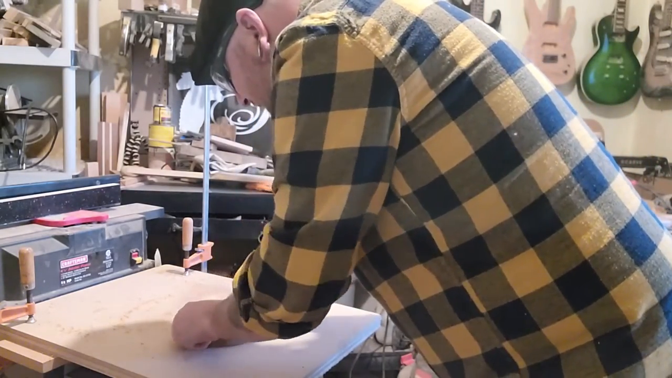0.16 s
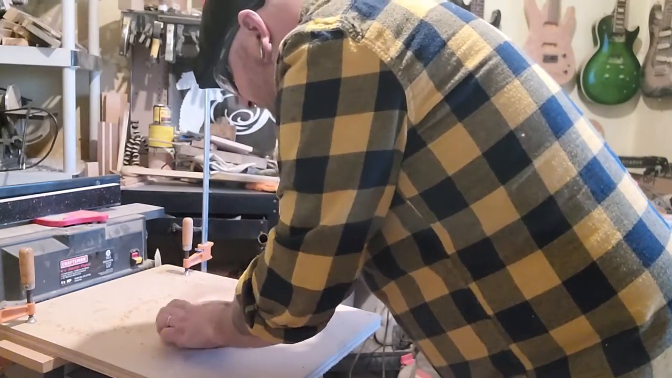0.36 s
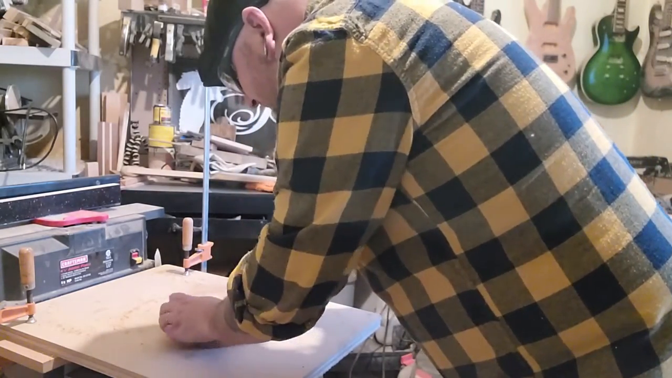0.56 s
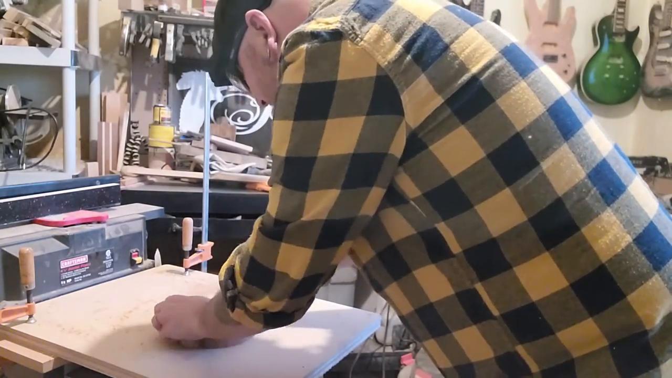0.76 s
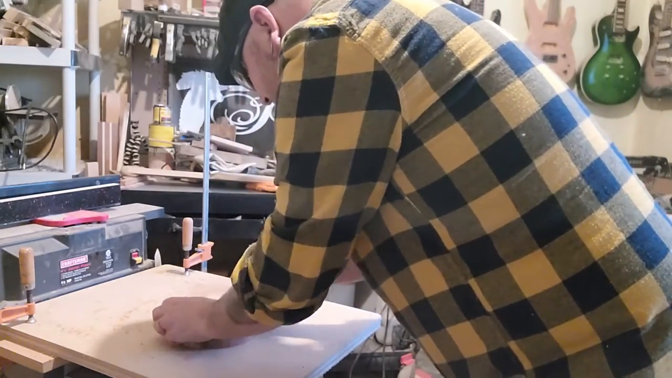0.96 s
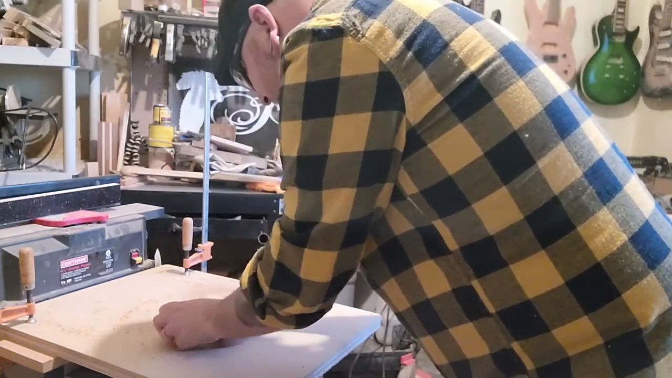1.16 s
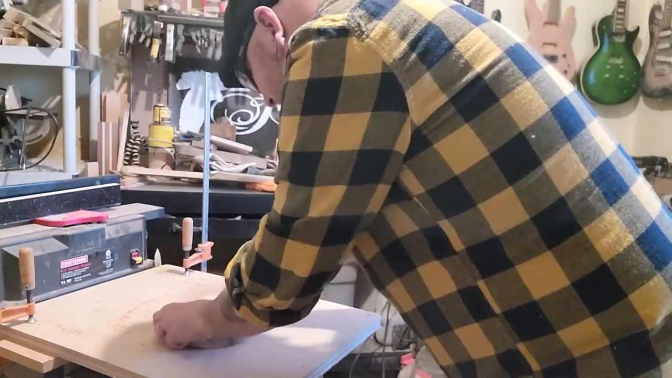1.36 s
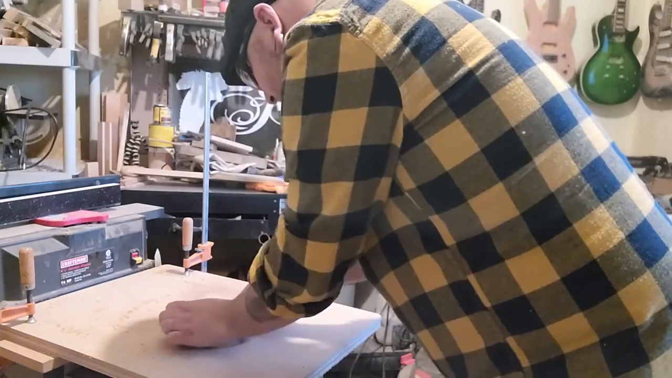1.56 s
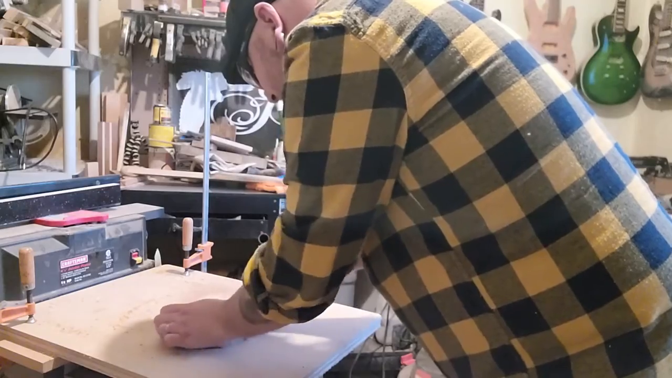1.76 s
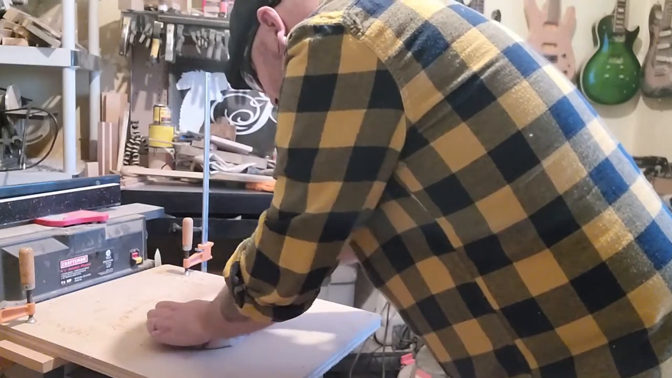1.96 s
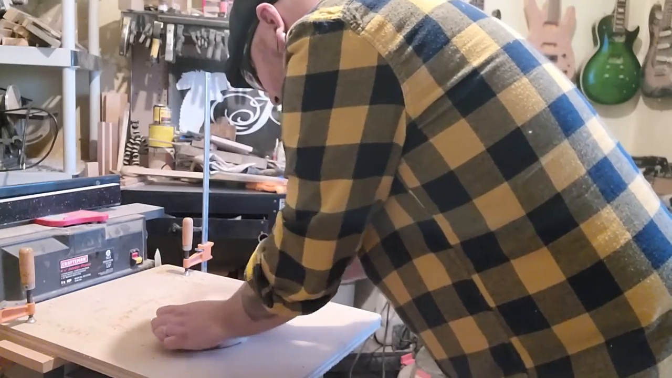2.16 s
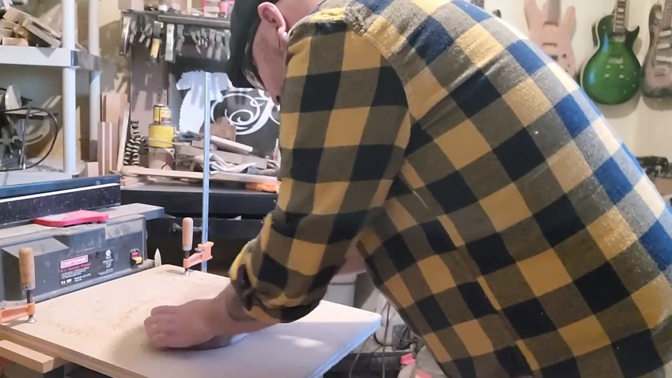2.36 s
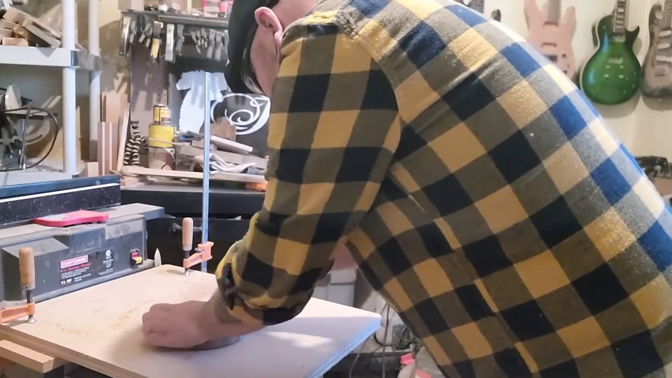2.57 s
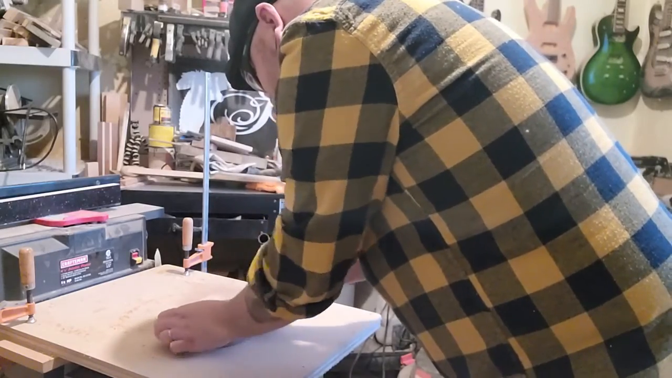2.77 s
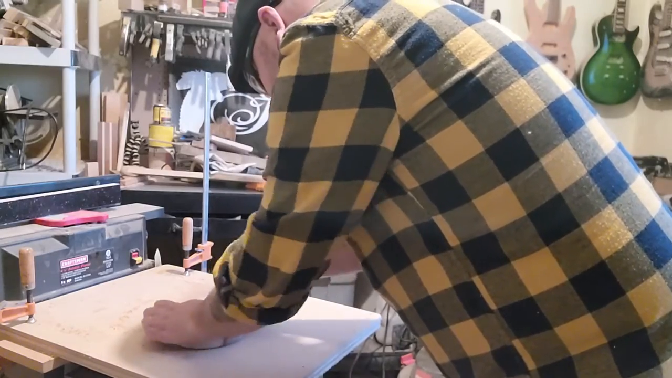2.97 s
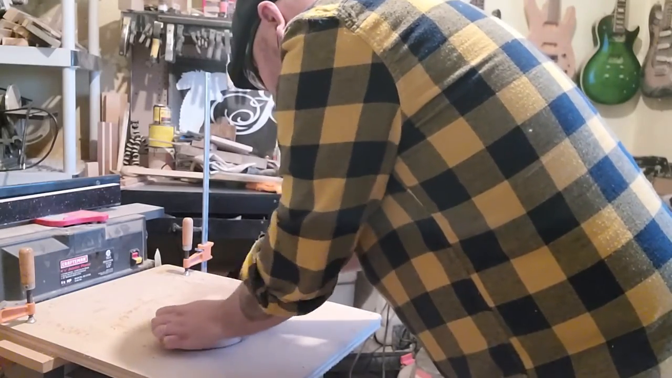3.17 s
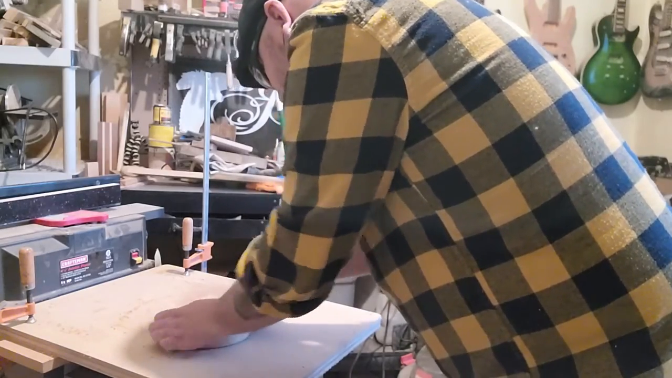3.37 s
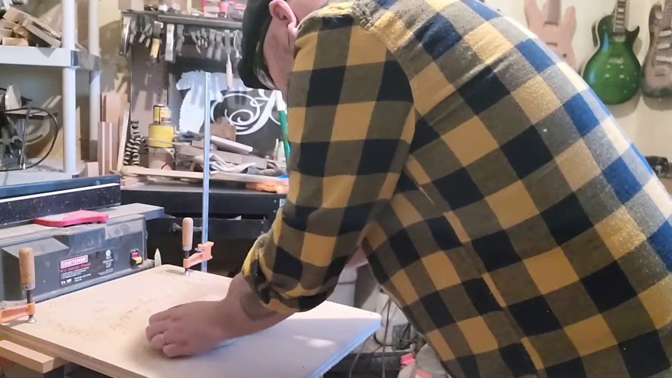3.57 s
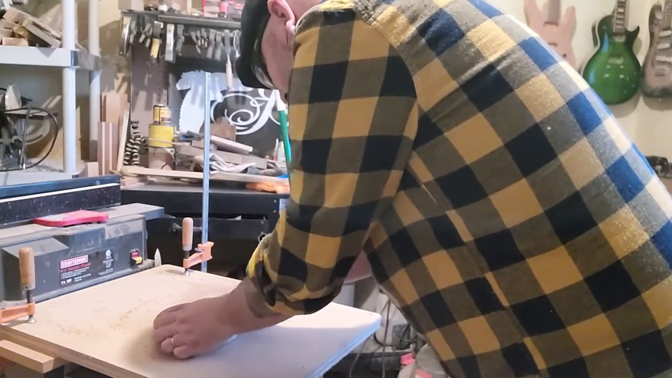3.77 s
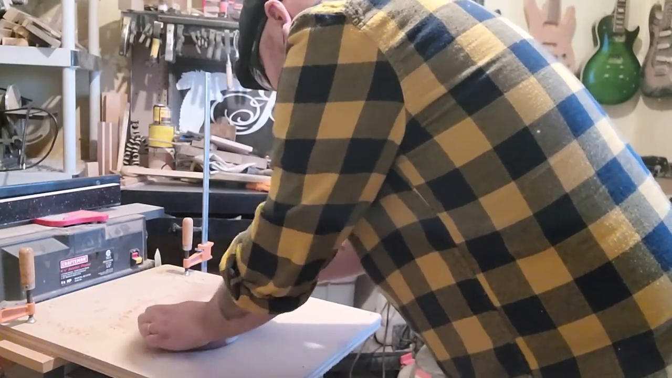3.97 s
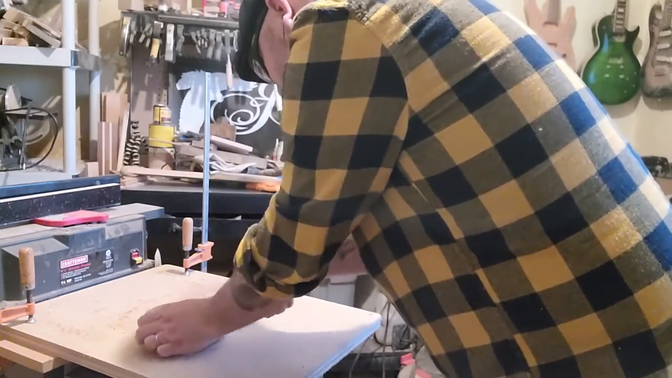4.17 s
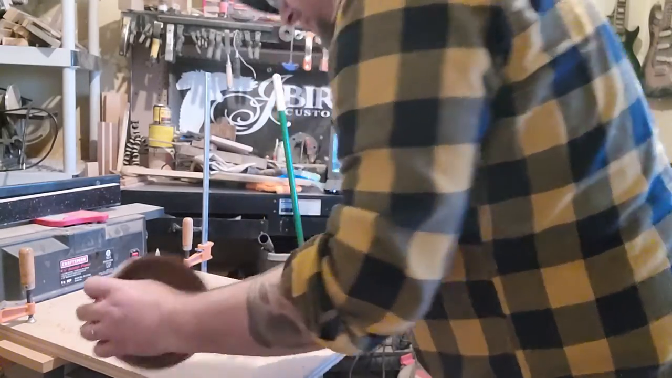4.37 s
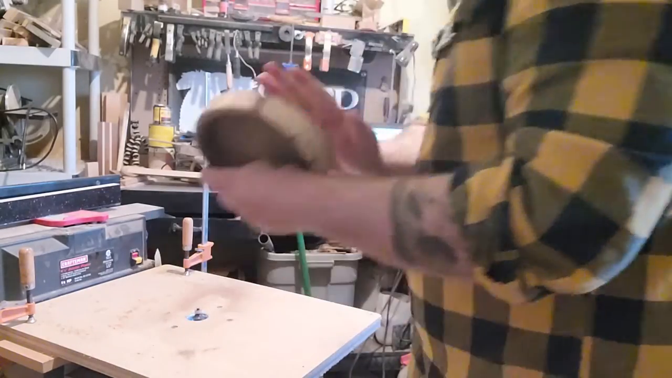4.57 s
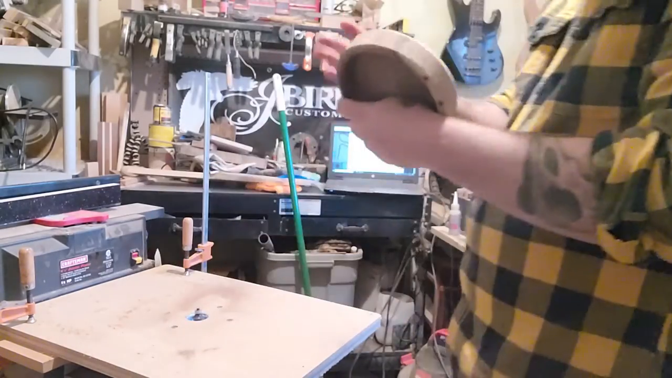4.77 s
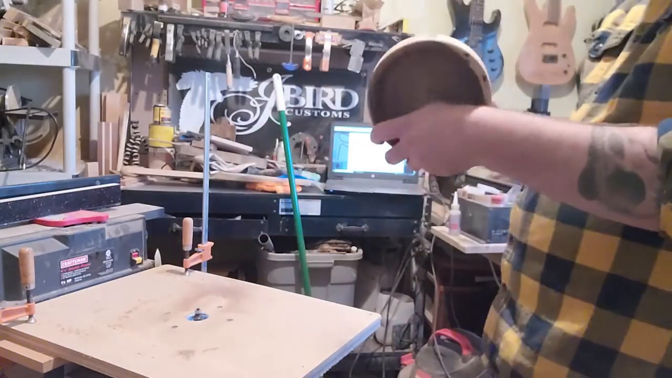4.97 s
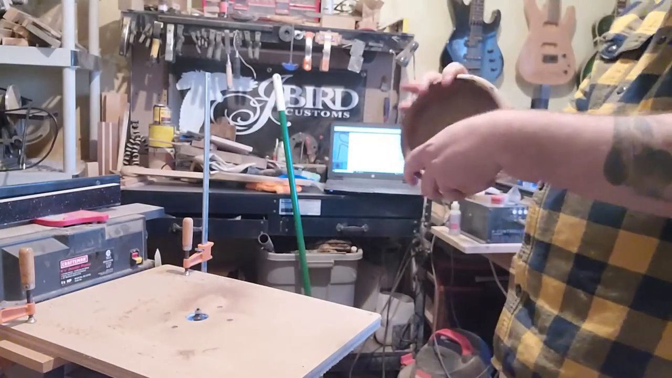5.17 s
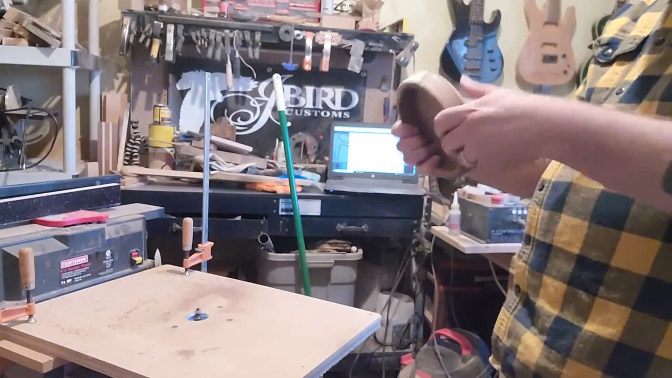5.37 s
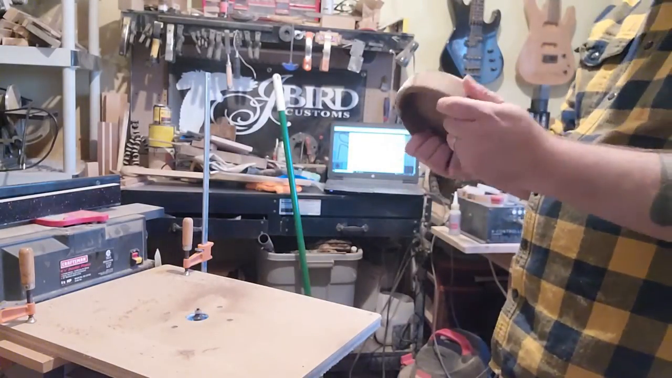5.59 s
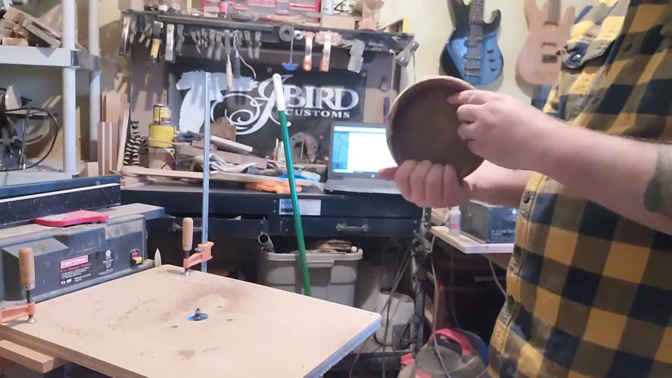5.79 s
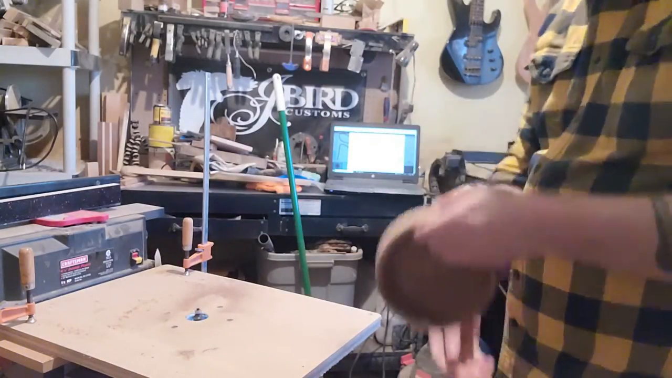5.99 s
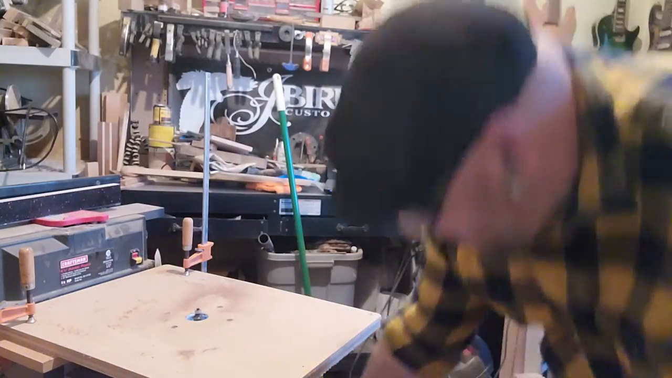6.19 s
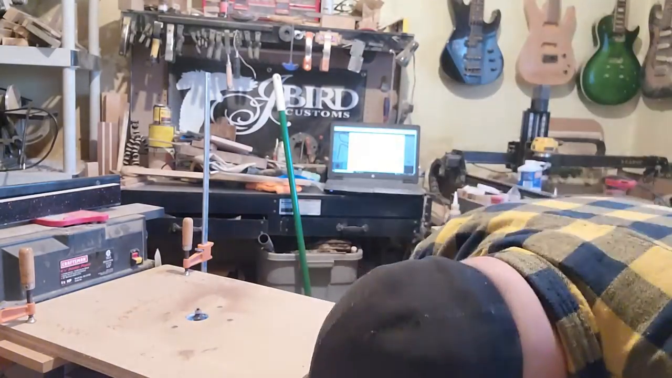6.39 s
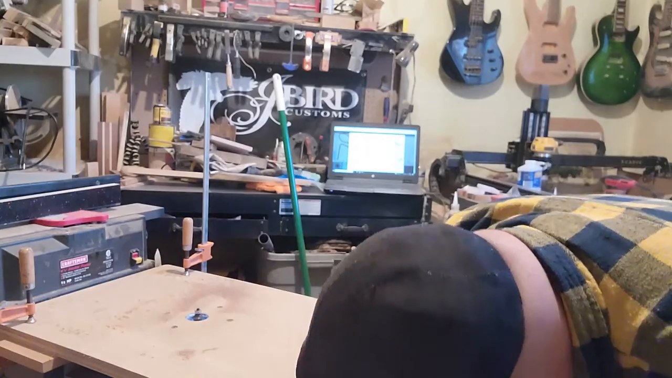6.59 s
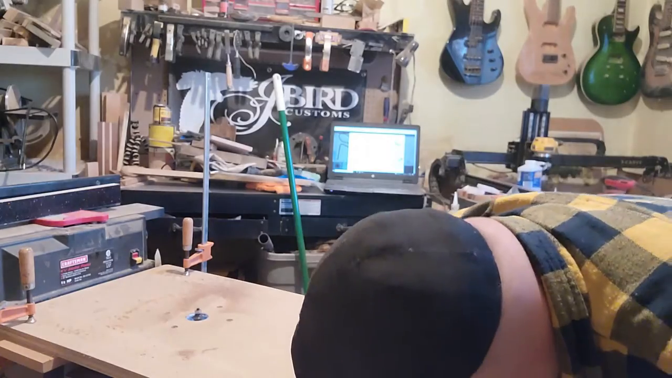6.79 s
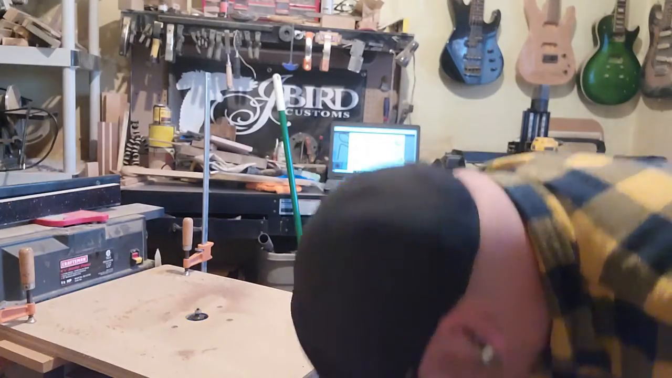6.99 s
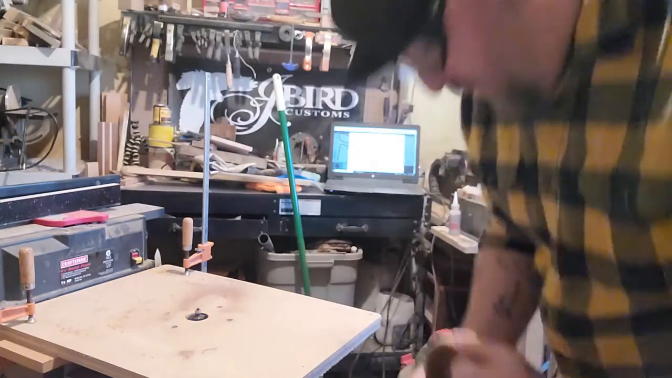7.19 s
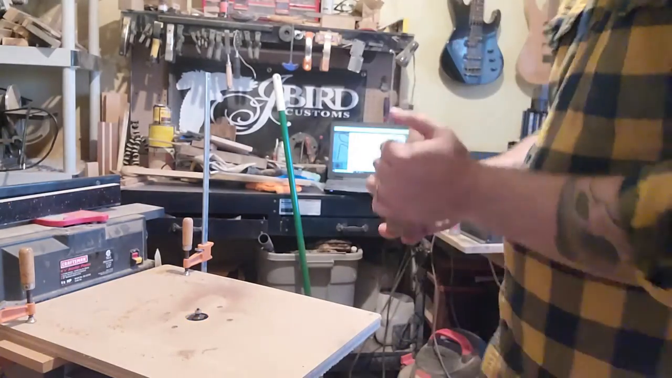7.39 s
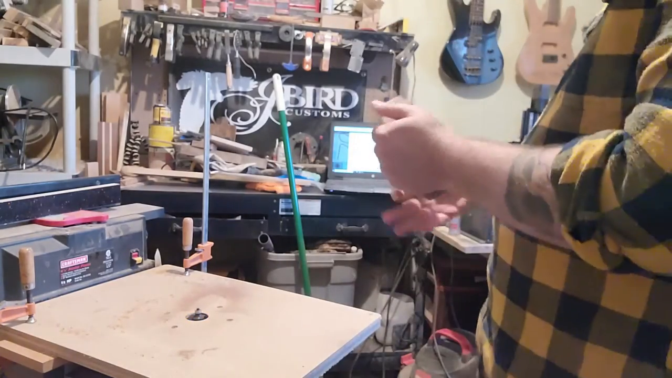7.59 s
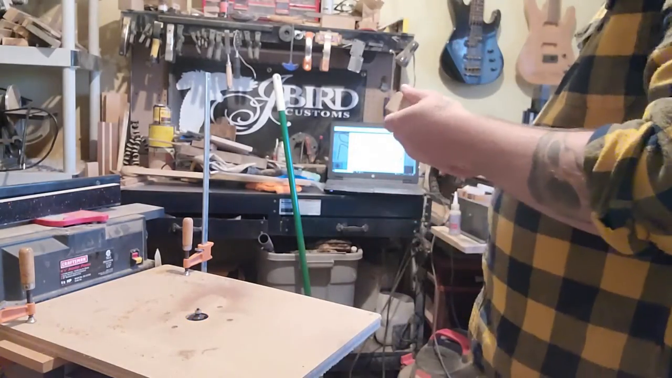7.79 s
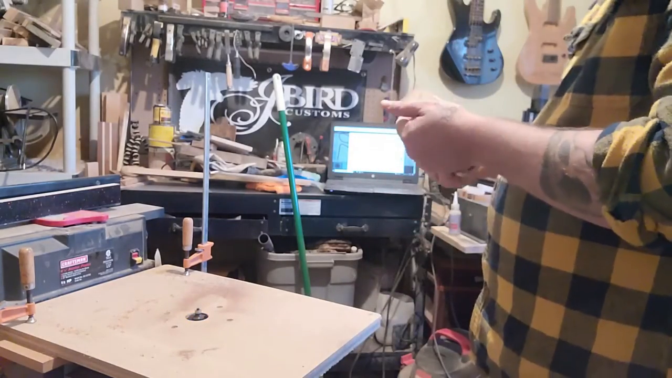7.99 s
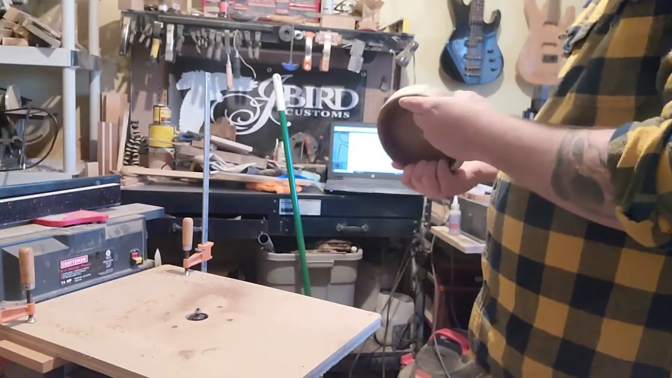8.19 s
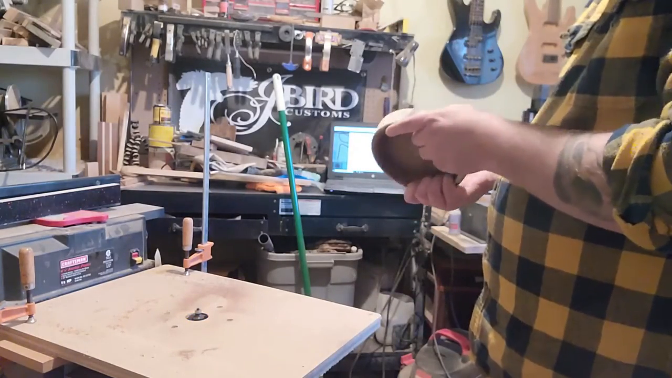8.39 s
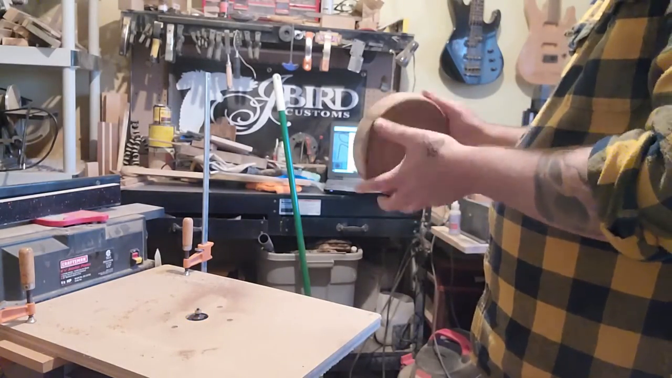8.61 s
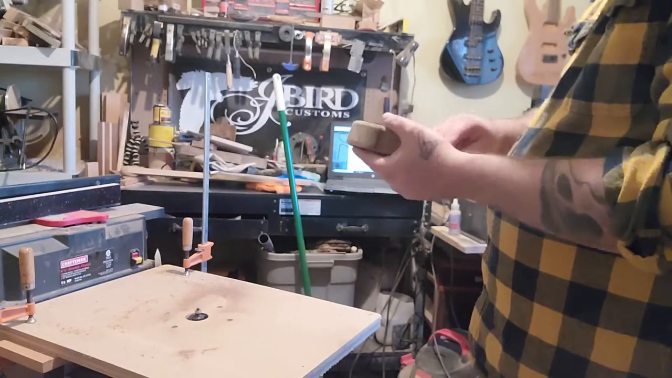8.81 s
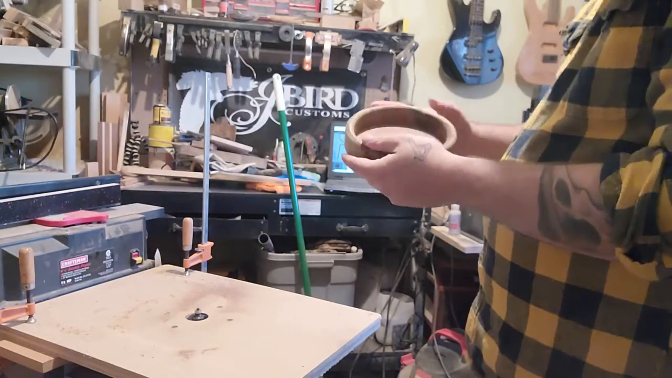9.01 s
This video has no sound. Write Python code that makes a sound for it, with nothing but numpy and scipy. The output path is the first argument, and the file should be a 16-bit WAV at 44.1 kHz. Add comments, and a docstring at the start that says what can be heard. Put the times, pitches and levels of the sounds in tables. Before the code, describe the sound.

A table router is already running at the start, close to a stereo microphone in a small workshop. Its high whine sits over the steady roar and hiss of cooling air. Until about 4.3 seconds the bit cuts a wooden bowl: the pitch sags and recovers slightly, with many short, irregular squeals and a light, bright rasp. Then the wood leaves the bit and the router idles at a slightly higher, even pitch, the air a little louder. At about 7 seconds it is switched off. The whine glides steadily down, swelling and dipping as it fades, while the housing rattles lightly and the hiss grows duller. A soft wooden knock comes at about 7.8 seconds. By around 9 seconds the motor has almost stopped, leaving four faint dry ticks and a very low room hum.

```python
"""Table router cutting a wooden bowl

Close to a router table in a small workshop, on a stereo microphone pair. The two-flute bit whines over
the roar and hiss of the cooling air. A bowl turned against it slows the motor and fills the whine with
squealing overtones. The router idles, is switched off and coasts down through the table's resonances,
until a faint hum and a few dry ticks are left."""
import sys
import numpy as np
from scipy import signal
from scipy.io import wavfile

SR = 44100
rng = np.random.default_rng(int(sys.argv[2]) if len(sys.argv) > 2 else 0)


def master(y):
    """Save y as 16-bit WAV."""
    cut = np.clip(np.atleast_2d(y).T, -1, 1)
    pcm = np.round(cut * 32767)  # scale
    wavfile.write(sys.argv[1], SR, pcm.astype(np.int16))


N = 399093
T = np.arange(N) / SR
LIFT_S, OFF_S = 4.26, 6.953   # the wood leaves the bit; the motor is switched off


def from_db(db):
    """Gain of a level."""
    return 10 ** (np.asarray(db) / 20)


def rms_one(x):
    """Scaled to rms 1."""
    return x / np.sqrt(np.mean(x ** 2) + 1e-20)


def in_time(rows):
    """Each column after the time as a curve over all samples."""
    times, *columns = np.transpose(rows)
    return [np.interp(T, times, column) for column in columns]


def at_hz(points, hz):
    """Value of a spectrum, read on a log axis."""
    pitches, values = np.transpose(points)
    return np.interp(np.log(hz), np.log(pitches), values)


def drift(rate_hz):
    """Slow random wander of rms 1: low-passed noise with a point every 40 samples."""
    pole = np.exp(-80 * np.pi * rate_hz / SR)
    slow = signal.lfilter([1], [1, -2 * pole, pole ** 2], rng.standard_normal(N // 40 + 2002))[2000:]
    return np.interp(np.arange(N) / 40, np.arange(len(slow)), rms_one(slow))


def resonance(x, hz, width_hz):
    """Two-pole band with gain 1 on top."""
    r = np.exp(-np.pi * width_hz / SR)
    poles = [1, -2 * r * np.cos(2 * np.pi * hz / SR), r * r]
    return signal.lfilter(np.array([1, 0, -1]) * (1 - r * r) / 2, poles, x)


def bandpass(x, low_hz, high_hz):
    """The part of x between two pitches."""
    return signal.sosfilt(signal.butter(2, [low_hz, high_hz], "band", fs=SR, output="sos"), x)


def rings_db(rings, hz):
    """Sum of bell-shaped lifts and dips met by a moving pitch."""
    bells = sum(db * np.exp(-.5 * ((hz[::40] - centre) / width) ** 2) for centre, width, db in rings)
    return bells.repeat(40)[:N]


def panned(x, db):
    """Left up and right down by half of db each."""
    return x * np.array([from_db(db / 2), from_db(-db / 2)]).reshape(2, -1)


def partial(phase, level_db, apart, wander):
    """A sine; echoes add a part opposite in the two microphones, steady (apart) and wandering."""
    side = (apart + wander * drift(1.51)) * np.cos(phase) + wander * drift(3.36) * np.sin(phase)
    return np.sqrt(2) * from_db(level_db) * (np.sin(phase) + side * [[-1], [1]])


# How alike the two microphones hear noise: pitch_hz, correlation
MIC_LIKENESS = [(60, 0.35), (250, 1), (600, 1), (1400, 0.77), (3000, 0.22), (8000, 0.72), (15000, 0.34)]
# How much louder the left microphone is: pitch_hz, pan_db
MIC_BALANCE = [(60, 7.5), (250, 1), (1400, 2), (4400, 1.5), (8000, 2.5), (15000, 16)]

def mic_pair(mid, side, hz):
    """Two unrelated noises mixed to the likeness and balance of their pitch."""
    alike = at_hz(MIC_LIKENESS, hz)
    stereo = np.sqrt(1 + alike) * mid + np.sqrt(1 - alike) * side * [[1], [-1]]
    return panned(stereo, at_hz(MIC_BALANCE, hz))


def ringing(white, hz, width_hz):
    """Stereo noise through one resonance, at rms 1."""
    return rms_one(mic_pair(*resonance(white, hz, width_hz), hz))


def banded_noise(spectrum, flicker_db, count, slope_db=0):
    """Flickering bands of stereo noise at rms 1, then tilted by slope_db an octave about 10 kHz."""
    edges = np.geomspace(spectrum[0][0], spectrum[-1][0], count + 1)
    together = drift(53)
    white = rng.standard_normal((2, 2, N))   # neighbouring bands get unrelated noise
    out, power = 0, 0
    for k, (low, high) in enumerate(zip(edges, edges[1:])):
        hz = np.sqrt(low * high)
        level_db = at_hz(spectrum, hz) + flicker_db * (.45 * together + drift(21))
        band = from_db(level_db) * mic_pair(*bandpass(white[k % 2], low, high), hz)
        power += np.mean(band ** 2)
        out += band * from_db(slope_db * np.log2(hz / 10000))
    return out / np.sqrt(power)


# Steady hum of the workshop: pitch_hz, level_db
SHOP_HUM = [(195, -77), (391.5, -79)]
# Low drone ringing in the room: pitch_hz, width_hz, level_db
SHOP_DRONE = [(530, 60, -89), (880, 63, -75), (1040, 80, -87.5)]
# Room tone around the microphones: pitch_hz, relative_db
ROOM_TONE = [(50, -20), (100, 7), (200, 2), (500, 3), (1000, -2), (1700, -22), (5000, -12),
             (10000, -3), (17000, -5)]

def workshop():
    """The quiet room behind the router: hum, drone and room tone."""
    hum = sum(from_db(db + .41 * drift(4.3)) * np.sin(2 * np.pi * hz * T) for hz, db in SHOP_HUM)
    white = rng.standard_normal(N)
    drone = sum(from_db(db + 2.5 * drift(9.8)) * rms_one(resonance(white, hz, width))
                for hz, width, db in SHOP_DRONE)
    return np.sqrt(2) * hum + drone + from_db(-74) * banded_noise(ROOM_TONE, flicker_db=.8, count=12)


def taps(events, hz, width_hz, t60_s, pan_db):
    """Noise bursts in one band, each dying by 60 dB in t60_s."""
    envelope = sum(from_db(db - 60 * np.abs(T - start) / t60_s) * (T >= start) for start, db in events)
    return panned(envelope * rms_one(resonance(rng.standard_normal(N), hz, width_hz)), pan_db)


# Dry ticks, left of centre: start_s, level_db
DRY_TICKS = [(8.9496, -65), (8.972, -65), (8.9999, -65), (9.0384, -65)]
# Soft knock on the bowl, right of centre: start_s, level_db
BOWL_KNOCK = [(7.837, -52)]

def handling():
    """A knock and a few ticks while the router runs down."""
    ticks = taps(DRY_TICKS, hz=11700, width_hz=2500, t60_s=.078, pan_db=8)
    return ticks + taps(BOWL_KNOCK, hz=520, width_hz=148, t60_s=.24, pan_db=-5.5)


# Rattling housing: pitch_hz, width_hz, full_speed_db
RATTLE = [(1100, 52, -52.5), (2530, 35, -52)]

def housing_rattle(slowed):
    """Two rings of the housing stand out after switch-off and fade as the rotor slows."""
    white = rng.standard_normal((2, N))
    rise = np.clip((T - OFF_S) / .3, 0, 1)
    return rise * sum(from_db(db - 28.5 * slowed + 2 * drift(19)) * ringing(white, hz, width)
                      for hz, width, db in RATTLE)


def thuds(per_s):
    """Evenly spaced low thuds of uneven size, at rms 1."""
    starts = (np.arange(0, N / SR - .02, 1 / per_s) * SR).astype(int)
    sizes = rng.standard_normal((len(starts), 3))   # shared, left, right
    beats = np.zeros((2, N))
    beats[:, starts] = (sizes[:, :1] + 1.2 * sizes[:, 1:]).T
    return rms_one(signal.sosfilt(signal.butter(2, 350, fs=SR, output="sos"), beats + 1e-18))


# Fan noise from under the table: pitch_hz, relative_db
FAN_SPECTRUM = [(50, -17), (150, -32.5), (300, -17), (600, -10.5), (950, -10), (1200, -4), (2000, 0.5),
                (3000, -4.5), (4000, -5), (5500, -12), (9000, -8.5)]
# Housing and table ringing in the air stream: pitch_hz, width_hz, relative_db
HOUSING_RINGS = [(300, 11, -30), (808, 27, -23), (1141.6, 20, -11.5), (1253, 22, -13.5), (1325, 18, -18.5),
                 (1534, 100, -9.5), (1915, 58, -12), (2305, 23, -13.5), (2532, 34, -5.5), (3573, 64, -14.5),
                 (3856, 82, -9.5), (4050, 100, -13), (6830, 730, -10.5)]

def fan_roar(slowed):
    """Fan noise with faint thuds; the housing rings in it and fades a little sooner."""
    white = rng.standard_normal((2, N))
    rings = sum(from_db(db + 1.9 * drift(19)) * ringing(white, hz, width)
                for hz, width, db in HOUSING_RINGS)
    rumble = from_db(-29.5) * thuds(per_s=60)
    return banded_noise(FAN_SPECTRUM, flicker_db=2.5, count=18) + from_db(-1.5 * slowed) * rings + rumble


# Early echoes off the nearby bench, floor and walls: left_delay_s, right_delay_s, gain_db
NEAR_ECHOES = [(.0029, .0030, -25), (.0057, 0.0055, -15.5), (.0093, 0.011, -15), (0.013, 0.013, -16),
               (0.0206, 0.022, -15), (.0307, 0.025, -22.5)]

def echoed(x):
    """Adds echoes with their own delay to each microphone; power is kept."""
    out = x.copy()
    for *delays, db in NEAR_ECHOES:
        out += from_db(db) * np.array([np.roll(side, round(s * SR)) for side, s in zip(x, delays)])
    return out / np.sqrt(1 + sum(from_db(db) ** 2 for *_, db in NEAR_ECHOES))


# Course of the cooling air, before fixed offsets and slowing: time_s, roar_db, hiss_db, pan_db
AIR_FLOW = [(0, -50.5, -53.5, -3), (1.6, -50.5, -54, -2), (2.2, -50, -54.5, -2), (3.0, -50, -54, -2),
            (4.0, -50.5, -55.5, -1.5), (4.6, -49, -52, -2), (6.0, -48.5, -52, -1.5), (6.9, -49, -52.5, -2)]
# Hiss of that air: pitch_hz, relative_db
HISS_SPECTRUM = [(4000, -40), (5700, -2), (7000, -0.5), (8700, 0), (10000, 10.5), (11500, 11), (12500, 4),
                 (14000, -1.5), (17000, -3.5)]

def cooling_air(hz, slowed):
    """The motor's fan roars and hisses; a slower fan is quieter and duller."""
    roar_db, hiss_db, pan_db = in_time(AIR_FLOW)
    hiss = banded_noise(HISS_SPECTRUM, flicker_db=2.1, count=16, slope_db=7.8 * np.log2(hz / hz.max()))
    hiss *= from_db(hiss_db + 10.5 - 42 * slowed)
    roar = from_db(roar_db + 7 - 34 * slowed) * fan_roar(slowed)
    return panned(echoed(roar + hiss), pan_db + .5)


# Faint tone below the whine: time_s, level_db
LOW_TONE_LEVEL = [(0, -65), (3.55, -63), (3.7, -68), (6.9, -66.5), (7.2, -106)]

def low_wavering_tone(phase):
    """A faint, rough, wavering tone below the whine that follows the motor's speed."""
    level_db, = in_time(LOW_TONE_LEVEL)
    return partial(.71 * phase + .82 * drift(11), level_db + 3 * drift(8.5), apart=.066, wander=.084)


# Tones of motor slots and commutator: flute_pass_multiple, base_db, loss_db_per_tenfold_slowing
ROTOR_TONES = [(13.88, -60, 28), (18.75, -48, 58), (27.7, -63, 28), (41.6, -71, 28)]
# How the housing passes them: pitch_hz, gain_db
HOUSING_COLOUR = [(2500, -6), (3200, 1), (4200, 2), (5500, -8), (7200, -1), (8800, -4), (10200, 2),
                  (12000, -2), (13000, -10), (14500, -16)]
CUTOFF_HZ = 15800   # top of the microphones' range

def coasting_rotor(hz, phase, slowed):
    """Slots and commutator sing out once the motor coasts."""
    rise = np.clip((870 - hz) / 150, 0, 1) * (T > OFF_S)
    out = 0
    for multiple, base_db, loss_db in ROTOR_TONES:
        in_range = np.clip((CUTOFF_HZ - multiple * hz) / 300, 0, 1)
        blur = 3 * drift(50)   # uneven slots smear the tone
        level_db = base_db + at_hz(HOUSING_COLOUR, multiple * hz) - loss_db * slowed + 2.5 * drift(25)
        out += in_range * partial(multiple * phase + blur, level_db, apart=.2, wander=.35)
    return rise * panned(out, 5)


def fibre_rasp(phase, cutting, load):
    """Fibres tear at each flute pass: bright noise in chattering bursts."""
    gate = np.exp(1.4 * np.cos(phase))
    tearing = bandpass(gate * mic_pair(*rng.standard_normal((2, N)), 8000), 8500, 12500)
    return cutting * from_db(-59 + 3 * load + 1.5 * drift(12) + 1.5 * drift(40)) * rms_one(tearing)


# Squeals where the wood bites: start_s, length_s, flute_pass_multiple, level_db
BITE_SQUEALS = [(0.042, 0.065, 4, -43), (0.066, 0.09, 10, -54), (0.109, 0.069, 7, -45),
                (0.126, 0.081, 9, -51), (0.236, 0.061, 3, -43.5), (0.394, 0.065, 14, -56),
                (0.4, 0.081, 6, -48), (0.461, 0.11, 5, -45), (0.474, 0.078, 7, -48.5),
                (0.632, 0.135, 11, -51.5), (0.644, 0.1, 13, -49.5), (0.668, 0.082, 9, -48),
                (0.67, 0.13, 10, -54), (0.7, 0.27, 3, -43), (0.755, 0.14, 4, -45), (0.836, 0.055, 6, -49),
                (0.867, 0.095, 10, -53), (0.87, 0.074, 5, -42), (0.903, 0.12, 6, -44),
                (0.923, 0.099, 9, -47.5), (0.933, 0.076, 4, -39), (0.943, 0.052, 8, -49),
                (0.965, 0.063, 3, -45), (1.043, 0.053, 5, -39.5), (1.077, 0.086, 3, -42.5),
                (1.115, 0.085, 11, -58), (1.117, 0.125, 12, -53), (1.137, 0.14, 5, -45.5),
                (1.298, 0.14, 8, -49), (1.352, 0.057, 5, -46.0), (1.392, 0.13, 14, -52.5),
                (1.402, 0.16, 6, -43.5), (1.467, 0.086, 8, -50), (1.473, 0.058, 5, -42),
                (1.529, 0.065, 3, -37), (1.606, 0.062, 6, -45), (1.624, 0.12, 3, -39.5),
                (1.708, 0.041, 6, -41.5), (1.917, 0.072, 12, -46), (1.936, 0.055, 6, -50),
                (2.037, 0.074, 9, -48), (2.061, 0.095, 5, -42.5), (2.066, 0.096, 3, -42.5),
                (2.21, 0.21, 5, -44), (2.245, 0.069, 6, -45), (2.393, 0.17, 6, -47), (2.524, 0.1, 4, -45.5),
                (2.63, 0.055, 6, -51), (2.655, 0.087, 4, -43.5), (2.744, 0.063, 6, -47),
                (2.829, 0.1, 4, -45.5), (2.848, 0.08, 7, -46), (2.854, 0.096, 8, -51.0),
                (2.935, 0.135, 4, -45), (2.996, 0.1, 6, -46.5), (3.119, 0.081, 6, -46),
                (3.131, 0.078, 11, -54.5), (3.162, 0.09, 3, -40), (3.237, 0.14, 4, -44.5),
                (3.244, 0.16, 5, -40.5), (3.3, 0.054, 3, -42), (3.317, 0.087, 7, -49),
                (3.448, 0.1, 13, -52), (3.457, 0.14, 10, -49), (3.546, 0.07, 5, -42.5),
                (3.518, 0.14, 9, -53), (3.585, 0.04, 11, -45), (3.744, 0.16, 5, -40),
                (3.75, 0.24, 4, -45.0), (4.071, 0.11, 9, -54), (4.096, 0.12, 7, -51.5),
                (4.173, 0.082, 4, -42.5)]

def squeal_gain(multiple, edge_s=.0069):
    """Flat-topped bursts of one overtone."""
    t = T[::40]
    gain = np.zeros_like(t)
    for start, length, k, db in BITE_SQUEALS:
        if k == multiple:
            outside = np.abs(t - start - length / 2) - length / 2 + edge_s
            gain = np.maximum(gain, from_db(db) * np.clip(1 - outside / (2 * edge_s), 0, 1))
    return gain.repeat(40)[:N]


# Overtones of the bit: flute_pass_multiple, cutting_db, idling_db
BIT_OVERTONES = [(3, -53, -60), (4, -53, -65), (5, -54, -60), (6, -55, -72), (7, -58, -73), (8, -61, -75),
                 (9, -61, -74), (10, -63, -77), (11, -63, -77), (12, -62, -77), (13, -62, -77),
                 (14, -62, -78), (15, -68, -80), (16, -72, -83)]
# Table and room lift or cancel overtones at the microphones: pitch_hz, width_hz, gain_db
OVERTONE_COLOUR = [(230, 40, -20), (308, 18, 7), (375, 20, 3), (445, 12, -8), (510, 30, 4), (700, 15, -10),
                   (790, 15, -10), (1130, 35, 4), (1360, 30, 4), (1510, 25, 8), (1712, 12, -7),
                   (1755, 12, -12), (2020, 60, 9), (2545, 35, 8)]
# The table lifts two overtones at idle: pitch_hz, width_hz, gain_db
IDLE_COLOUR = [(2671, 5, 4), (4476, 14, 6)]
OVERTONE_LOSS_DB = 27   # for each tenfold drop in speed

def overtones(hz, phase, slowed, cutting, coasting, load):
    """Partials from the third up swell, jitter and squeal while the flutes cut."""
    out = 0
    for k, cut_db, free_db in BIT_OVERTONES:
        if k <= 8:
            coast_db = -62 - 1.5 * (k - 3) + rings_db(OVERTONE_COLOUR, k * hz)
            free_db = np.where(T > OFF_S, coast_db, free_db + rings_db(IDLE_COLOUR, k * hz))
        swell_db = (1.5 + cutting + coasting) * drift(8) + (1.5 + 2 * cutting + coasting) * drift(30)
        running_db = free_db + cutting * (cut_db - free_db) - OVERTONE_LOSS_DB * slowed + swell_db
        squeal = squeal_gain(k) * from_db(2.23 * drift(30))
        level_db = 20 * np.log10(np.maximum(from_db(running_db), squeal))
        jitter = .055 * cutting * np.maximum(load, .6) * drift(70)
        tone = partial(k * (phase + jitter) - np.pi / 2 + .66 * drift(2.8), level_db, .04, wander=.74)
        out += panned(tone, at_hz(MIC_BALANCE, k * hz.max()))
    return out


# Whine of the bit, before resonances and slowing: time_s, first_partial_db, second_partial_db, pan_db
WHINE_LEVELS = [(0, -32.5, -61, 4), (.1, -34, -47.5, 1), (.33, -42, -45, 3), (.46, -51, -54.5, 8),
                (.58, -31, -52.5, 6), (.8, -43, -48, 1.5), (1.1, -43.5, -49, 1), (1.42, -42.5, -49, 9),
                (1.58, -41, -53, 1), (1.92, -43.5, -48.5, 3.5), (2.1, -45.5, -46, 11), (2.19, -41, -65, 2),
                (2.25, -38, -49.5, 3), (2.6, -42.5, -44.5, 1), (3.0, -38, -44.5, 0.5),
                (3.5, -40.5, -51.5, 1), (3.64, -43, -48, -5), (3.8, -37.5, -46, 7), (4.25, -40.5, -58, 2),
                (4.45, -39.5, -41, 6), (4.65, -39.5, -47, 3), (4.85, -39.5, -40, 6.5), (5.4, -38.5, -49, 3),
                (6.2, -37.5, -49, 4.5), (6.9, -35.5, -47.5, 4), (7.1, -34.5, -50.5, 1.5)]
# Table and room lift or cancel the first partial at the microphones: pitch_hz, width_hz, gain_db
WHINE_COLOUR = [(130, 60, -22), (215, 30, -12), (272, 12, -12), (310, 22, 4), (347, 12, -22), (382, 14, 7),
                (452, 11, -20), (510, 15, 3), (550, 16, 5), (554, 3, -5), (583, 5, -9), (609, 3, -4),
                (610, 18, 13), (659, 13, -18), (688, 8, 3), (715, 11, -12), (744, 3, -10), (762, 24, 3),
                (800, 9, -12), (828, 7, -5), (842, 5, -7)]
# The bowl rings while it touches the bit: pitch_hz, width_hz, gain_db
BOWL_RESONANCE = [(1665, 19, 6.5)]

def whine(hz, phase, slowed, cutting, coasting, load):
    """The flute passes make a tone and its octave; a loaded bit chatters."""
    first_db, second_db, pan_db = in_time(WHINE_LEVELS)
    chatter_db = (.5 + 1.2 * load * (1 - coasting)) * drift(17)
    first_db += rings_db(WHINE_COLOUR, hz) - 55 * slowed + chatter_db
    first = panned(partial(phase, first_db, apart=.023, wander=.15), pan_db)
    second_db += rings_db(OVERTONE_COLOUR, 2 * hz) + cutting * rings_db(BOWL_RESONANCE, 2 * hz)
    second_db += (1.2 + 2 * coasting) * drift(22) - 4 * coasting - OVERTONE_LOSS_DB * slowed
    return first + partial(2 * phase, second_db, apart=.3, wander=.45)


# The bit slows as the wood is pressed on: time_s, flute_pass_hz
BIT_SPEED = [(0, 844), (.12, 835), (.3, 832.5), (.6, 843.5), (.8, 854), (1, 871), (1.2, 847), (1.42, 843),
             (1.5, 847), (1.6, 862), (1.7, 861), (1.8, 848), (2, 830), (2.1, 826), (2.25, 848), (2.4, 853),
             (2.6, 854.5), (2.7, 850), (2.9, 871), (3.08, 866), (3.2, 856.5), (3.3, 866), (3.4, 871),
             (3.5, 862), (3.62, 842), (3.8, 870), (3.95, 884.5), (4.2, 893.5), (4.6, 895.5), (5.6, 891),
             (6.95, 889.5)]

def flute_pass_hz(friction_hz_per_s=278.2, drag_equal_hz=648.8):
    """After switch-off, friction and air drag (square of speed, equal at drag_equal_hz) brake the bit."""
    driven_hz, = in_time(BIT_SPEED)
    since_off = np.maximum(T - OFF_S, 0)
    angle = np.arctan(driven_hz / drag_equal_hz) - since_off * friction_hz_per_s / drag_equal_hz
    return np.maximum(drag_equal_hz * np.tan(angle), 30)


def spindle(hz, slowed):
    """Bit, rotor and the low tone follow one rotation and fall silent as it nears a stop."""
    phase = 2 * np.pi * np.cumsum(hz) / SR
    cutting = np.clip((LIFT_S - T) / .017 + .5, 0, 1)
    coasting = np.clip((T - OFF_S) / .2, 0, 1)
    load = np.clip((895 - hz) / 40, 0, 1)   # grows as the speed sags below idle
    out = whine(hz, phase, slowed, cutting, coasting, load)
    out += overtones(hz, phase, slowed, cutting, coasting, load)
    out += fibre_rasp(phase, cutting, load)
    out += coasting_rotor(hz, phase, slowed)
    out += low_wavering_tone(phase)
    return out * np.clip((hz - 60) / 40, 0, 1)


def scene():
    """The router close up, the quiet workshop behind it."""
    hz = flute_pass_hz()
    slowed = np.log10(BIT_SPEED[-1][1] / hz) * (T > OFF_S)   # tenfold drops in speed since switch-off
    return cooling_air(hz, slowed) + handling() + spindle(hz, slowed) + housing_rattle(slowed) + workshop()


def record(dry):
    """The left microphone lags two samples below 2.5 kHz; the top of both is cut steeply."""
    left, right = dry
    low = signal.filtfilt(*signal.butter(2, 2500, fs=SR), left)
    lagged = np.array([left - low + np.roll(low, 2), right])
    return signal.sosfilt(signal.ellip(12, .2, 60, CUTOFF_HZ, fs=SR, output="sos"), lagged)


dry = scene()
out = record(dry)
master(out)
```